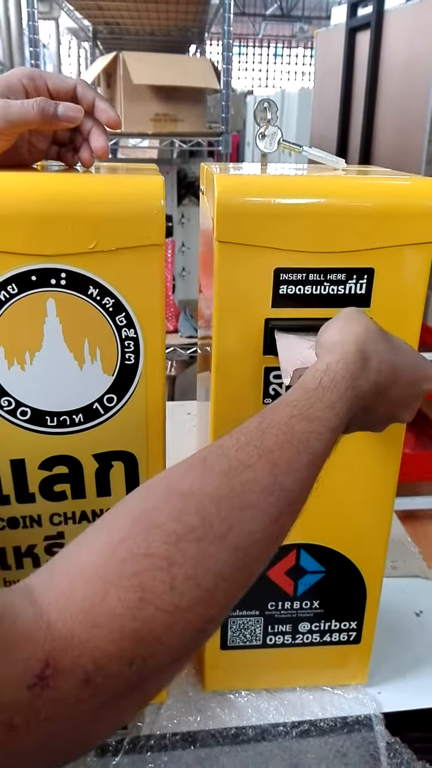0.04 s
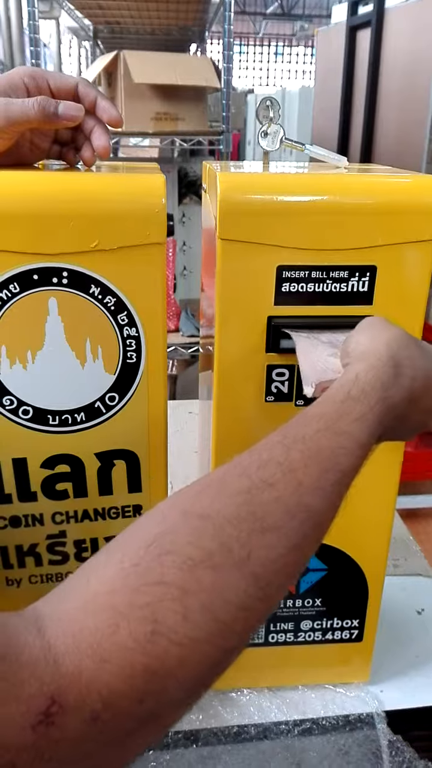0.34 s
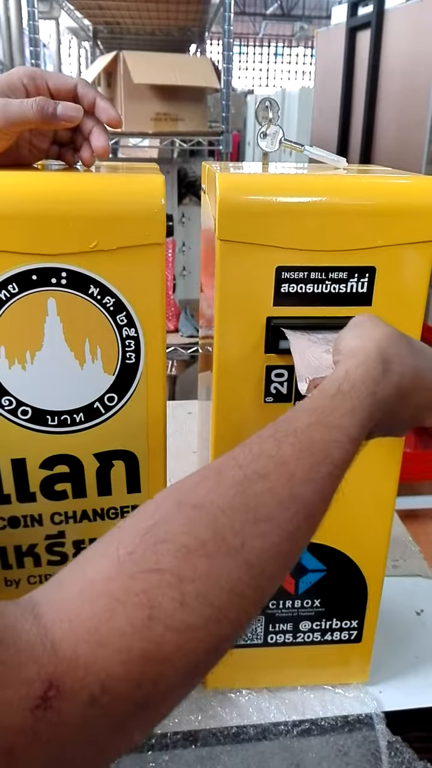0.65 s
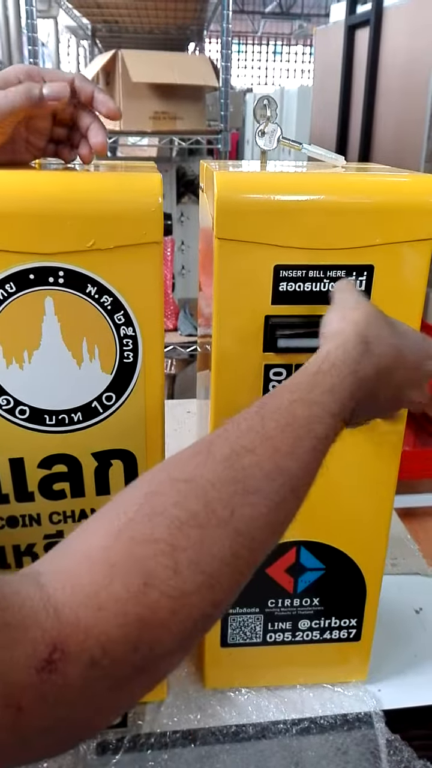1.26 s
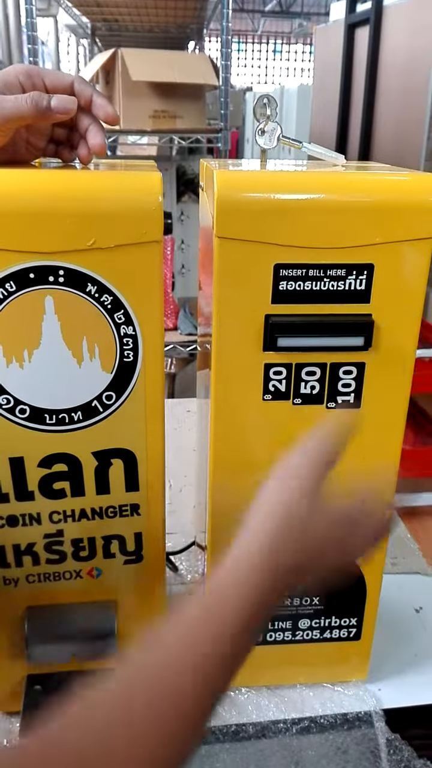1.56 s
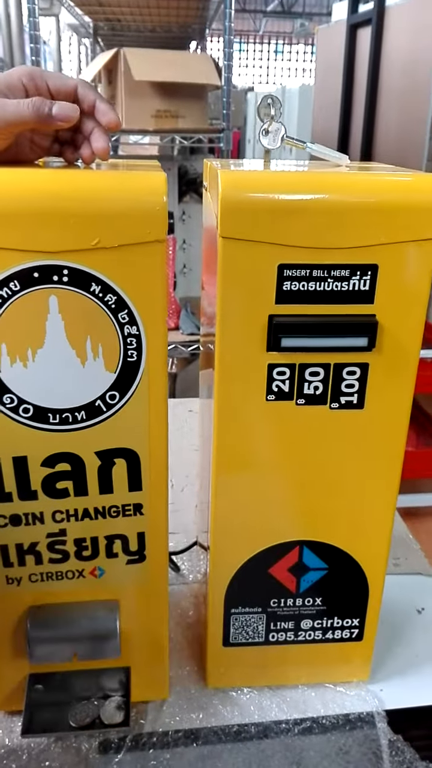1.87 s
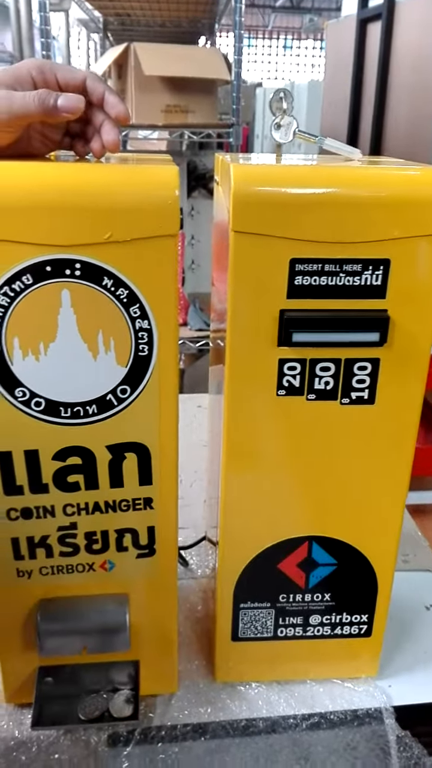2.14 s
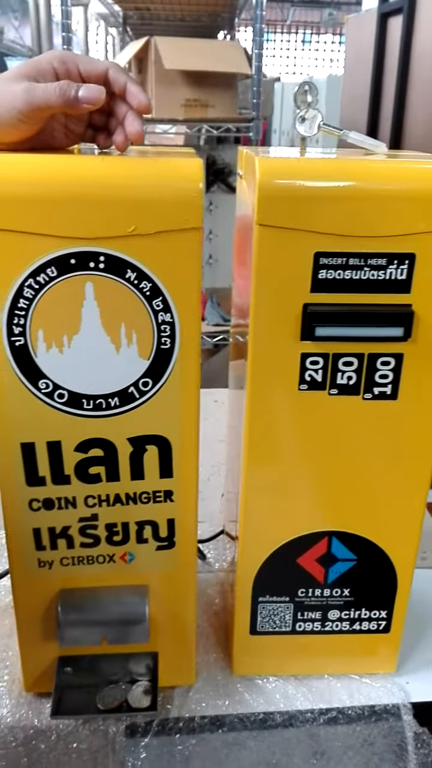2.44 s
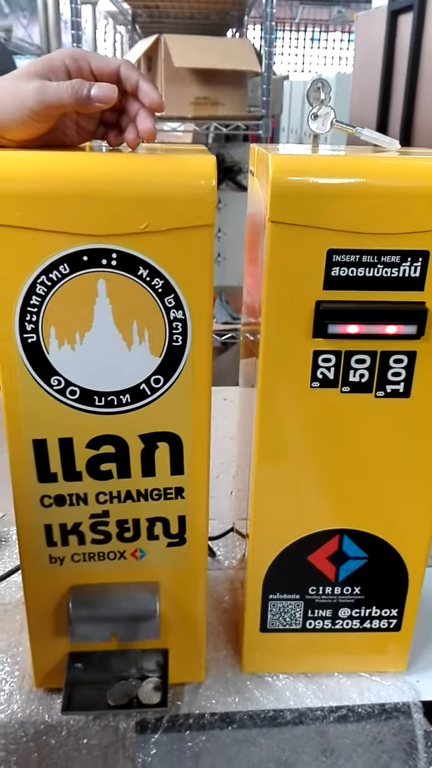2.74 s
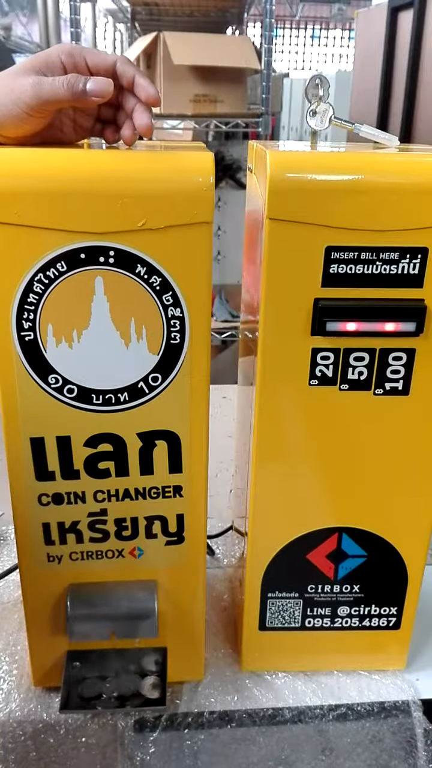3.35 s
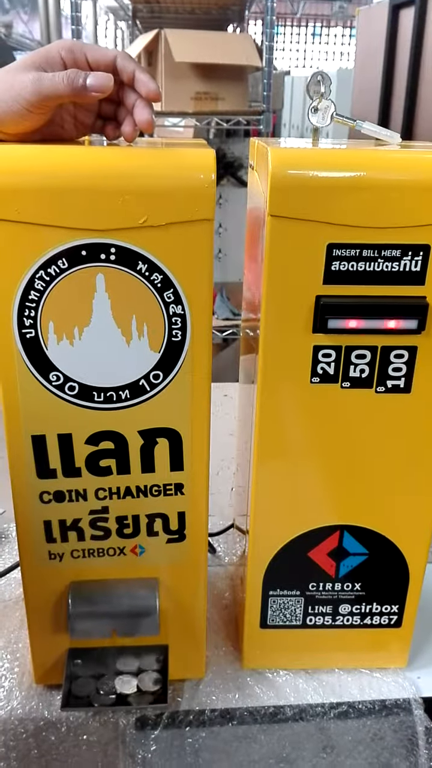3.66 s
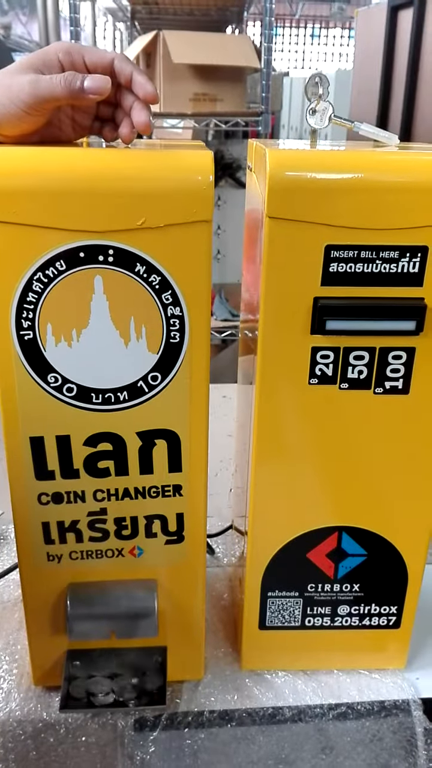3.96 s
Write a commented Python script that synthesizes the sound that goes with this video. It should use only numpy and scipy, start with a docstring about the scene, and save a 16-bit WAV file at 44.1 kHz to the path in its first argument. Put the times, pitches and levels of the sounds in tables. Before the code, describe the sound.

A coin changer whirs twice, then pays out coins in quick, ringing metallic clinks.

```python
"""A small geared motor whines twice over the low rumble of a room: a coin changer, close by, draws in a note.
Then its hopper pays out about five coins a second. The disc thuds against each coin, the ejector clacks,
and the coin strikes the steel chute, slides down it ringing, and lands on the other coins in the tray.
Each impact excites damped modes; friction is a dense train of tiny impacts shaped by resonance."""
import sys
import numpy as np
from scipy import signal
from scipy.fft import rfft, irfft
from scipy.io import wavfile
from scipy.ndimage import uniform_filter1d

SR = 44100
rng = np.random.default_rng(int(sys.argv[2]) if len(sys.argv) > 2 else 0)


def master_out(mix):
    """Clip the mix to full scale and print it as 16-bit PCM to the path in sys.argv[1]."""
    frames = np.transpose(np.atleast_2d(mix))
    ceiling = np.clip(frames, -1, 1)
    pcm = np.round(ceiling * 32767).astype(np.int16)
    wavfile.write(sys.argv[1], SR, pcm)


N = 176400
T = np.arange(N) / SR

# a coin strikes the chute: start_s, level_db, rise_s, slide_s, sliding_ring_db
CHUTE_HITS = [(2.7917, -7.5, 0.00017, 0.097, -18.5), (2.983, -5, 0.0033, 0.098, -18),
              (3.171, -0.5, 0.0092, 0.15, -20.5), (3.372, -8, 0.0011, 0.11, -14.5),
              (3.558, 0.5, 0.011, 0.081, -11.5), (3.7536, -5.5, 0.00057, 0.13, -18),
              (3.9458, -6, 0.00061, .1, -26)]
# a sliding coin knocks against the chute wall: start_s, level_db
WALL_KNOCKS = [(2.864, -17.5), (3.0876, -7.5), (3.224, -18), (3.236, -14.5), (3.249, -23), (3.492, -21),
               (3.604, -21), (3.619, -16), (3.957, -12.5)]
# the ejector snaps and rebounds: start_s, level_db
EJECTOR_CLACKS = [(2.757, -15.5), (2.7601, -11.5), (2.7689, -18.5), (2.955, -11.5), (2.964, -20),
                  (3.149, -11.5), (3.157, -12), (3.334, -14.5), (3.34, -11), (3.352, -14), (3.526, -10),
                  (3.715, -12), (3.721, -11.5), (3.915, -11)]
# a coin lands or bounces in the tray: start_s, level_db
LANDINGS = [(2.683, -14.5), (2.6959, -15.5), (2.874, -16), (2.882, -17.5), (2.897, -18), (3.066, -17.5),
            (3.074, -20), (3.093, -23.5), (3.261, -15.5), (3.273, -17.5), (3.283, -17), (3.298, -28.5),
            (3.449, -17), (3.46, -18), (3.642, -20), (3.65, -14.5), (3.837, -17), (3.845, -19.5),
            (3.86, -22)]
# coins slide over each other: start_s, stop_s, level_db
SHUFFLES = [(2.57, 2.623, -39), (2.916, 2.983, -21), (3.119, 3.18, -15), (3.295, 3.42, -23.5),
            (3.46, 3.566, -22), (3.864, 3.903, -20.5)]
# the disc pushes a coin to the exit: start_s
DISC_THUDS = [2.642, 2.838, 3.027, 3.22, 3.413, 3.605, 3.797]
# runs of the bill motor:
# start_s, stop_s, mesh_hz, spin_up_s, sag_share, gear_db, hiss_db, wobble_share, hiss_top_hz
MOTOR_RUNS = [(1.095, 1.437, 1279, .055, .01, -44, -51, 0.0061, 13800),
              (1.762, 2.407, 1311, .034, .11, -44, -48, 0.023, 10000)]
# airy whistles in the room hiss, thin squeals while the motor runs: start_s, stop_s, pitch_hz, level_db
WHISTLES = [(.06, .19, 7360, -67), (1.43, 1.72, 5430, -68), (1.3, 1.43, 4950, -60), (1.95, 2.38, 8050, -60),
            (1.87, 2.4, 9450, -59)]
# partials of the gear whine: mesh_multiple, level_db
WHINE_PARTIALS = [(.5, -20.5), (1, -5.5), (2, -7.5), (4, -20.5)]
# hum under load as the note is stacked: pitch_hz, level_db
STACK_HUM = [(151, -50.5), (304, -52.5)]
# resonances of the cabinet and hopper: pitch_hz, bandwidth_hz, level_db
CABINET_MODES = [(659, 10.2, 1), (808, 19.4, -3), (929, 5.9, 7), (1097, 12, 4), (1164, 140, -3),
                 (1470, 97, 0.5), (1683, 65, -3), (1880, 7.7, -7), (2510, 420, -10)]
# modes of a free coin, the ejector and chute, the filled tray and the panels: pitch_hz, level_db
COIN_MODES = [(7600, -9), (7720, -11), (8290, -6.5), (8410, -13.5), (13820, -3), (13960, 0)]
STEEL_MODES = [(1465, -8.5), (4328, -6), (5060, -5)]
TRAY_MODES = [(1940, -2.5), (3960, 2), (4080, 0), (4330, -6.5), (4748, -5.5), (5750, -5), (6975, -1),
              (8025, 1.5), (10565, -3), (11650, -5), (12780, 3)]
PANEL_MODES = [(215, -1.5), (251, -1), (339, -9)]
# relative spectral density of each source's noise: frequency_hz, level_db
CHUTE_SPECTRUM = [(200, -11), (700, -12), (1400, 3.5), (3000, -5.5), (5000, 4.5), (6500, -4), (11000, 6),
                  (14300, -2)]
SLIDE_SPECTRUM = [(1200, -1.5), (3200, 4), (4300, 4.5), (5100, 11), (6300, 1.5), (10000, 8), (14300, 5.5)]
EJECTOR_SPECTRUM = [(500, -22), (1400, 3.5), (3200, 1.5), (4300, 3), (6000, -2), (9000, -6.5), (14300, 2.5)]
TRAY_SPECTRUM = [(200, -24), (800, -14), (1800, -3), (3000, -6.5), (4200, -3.5), (9500, -6.5), (14300, -6)]
HOPPER_SPECTRUM = [(100, -6), (250, 1), (540, -18), (950, -8.5), (2000, -8), (4200, -19.5), (14300, -35.5)]
GEAR_SPECTRUM = [(310, -6), (480, -26), (700, -5), (790, -15.5), (950, -1), (1250, -2), (1600, 0),
                 (2050, -11), (2290, -2), (2450, -21.5), (6500, -21), (14000, -61)]
ROLLER_SPECTRUM = [(2700, 3), (3400, 1), (4800, 0), (6000, -6), (8200, -3), (14000, -12)]
ROOM_SPECTRUM = [(22, -5), (67, -7), (135, -11.5), (220, -21), (420, -32), (1100, -33), (2500, -40.5),
                 (7500, -44.5), (14300, -47.5)]
# filter of the stereo side signal: frequency_hz, gain_db
SIDE_SPECTRUM = [(2800, -52), (4500, -22), (6500, -16), (8200, -6), (10000, -14), (13500, -19)]

COIN_T60_S, STEEL_T60_S = 0.08, 0.044
FEED_RISE_S, FEED_COAST_S = 0.062, 0.041
GRIP_DELAY_S, GRIP_WIDTH_S = 0.14, 0.11
THUD_DB, THUD_RISE_S, GRIND_DB, BOOM_DB = -25.5, 0.0046, -35, -20


def chute():
    """Impact excites the modes of coin and chute; sliding friction then keeps driving both."""
    out, t = np.zeros(N), np.arange(SR // 3) / SR
    for start, db, rise, slide_s, ring_db in CHUTE_HITS:
        size = 1 + 0.0017 * rng.standard_normal()  # coins differ slightly in pitch
        coin = ring([(hz / size, level) for hz, level in COIN_MODES], COIN_T60_S)
        strike = crash(CHUTE_SPECTRUM, t60=0.063) + amp(-5) * coin
        add(out, start, amp(db) * strike * np.minimum(t[:len(coin)] / rise, 1))
        scrapes = grit(len(t), per_s=1600, spread_db=1)
        bodies = crash(SLIDE_SPECTRUM, t60=0.011), ring(STEEL_MODES, STEEL_T60_S), coin
        rattle, steel, singing = (unit(signal.fftconvolve(scrapes, body)[:len(t)]) for body in bodies)
        add(out, start, (amp(-19.5) * rattle + amp(-29) * steel) * gate(t, 0, slide_s, 0.0026, 0.036))
        add(out, start, amp(ring_db) * singing * gate(t, 0, 0.71 * slide_s, 0.0059, 0.025))
    return out


def wall_knocks():
    """A coin's collision with the chute wall sets the steel in free vibration."""
    out = np.zeros(N)
    for start, db in WALL_KNOCKS:
        knock = crash(SLIDE_SPECTRUM, STEEL_T60_S) + amp(3.5) * ring(STEEL_MODES, STEEL_T60_S)
        add(out, start, amp(db) * knock)
    return out


def ejector():
    """A sprung lever flicks each coin out; snap and rebound excite the steel impulsively."""
    out = np.zeros(N)
    for start, db in EJECTOR_CLACKS:
        clack = crash(EJECTOR_SPECTRUM, t60=0.083) + amp(3) * ring(STEEL_MODES, STEEL_T60_S)
        add(out, start, amp(db) * clack)
    return out


def tray():
    """Contact damping by the heap in the tray cuts short the ring of each landing."""
    out = np.zeros(N)
    for start, db in LANDINGS:
        clink = crash(TRAY_SPECTRUM, t60=0.047) + amp(-1) * ring(TRAY_MODES, t60=0.075, detune=0.0041)
        add(out, start, amp(db) * clink)
    return out


def loose_coins():
    """Friction between settling coins drives their modes in a thin, ringing hiss."""
    rubs = grit(N, per_s=3000, spread_db=1.8)
    hiss = unit(colour(rubs, SLIDE_SPECTRUM))
    ringing = unit(signal.fftconvolve(rubs, ring(COIN_MODES, COIN_T60_S))[:N])
    envelope = sum(amp(db) * gate(T, start, stop, 0.033, 0.043) for start, stop, db in SHUFFLES)
    return (hiss + amp(-5) * ringing) * envelope


def hopper(on_s=2.49):
    """Forced vibration: a motor stirs the coins, and its disc grinds on each and sets panels booming."""
    stirring = amp(-37) * unit(colour(grit(N, per_s=6000, spread_db=0.53), HOPPER_SPECTRUM))
    motor = hum(hz=140, db=-48) * gate(T, on_s, T[-1], 0.6, 1)
    out = (stirring + motor) * gate(T, on_s, T[-1], 0.0073, 1)
    load = amp(GRIND_DB) * gate(T, DISC_THUDS[0], T[-1], THUD_RISE_S, 1)
    for start in DISC_THUDS:
        load += amp(THUD_DB) * gate(T, start, start + 0.01, THUD_RISE_S, 0.014)
        boom = ring(PANEL_MODES, t60=0.16, detune=0.016)
        add(out, start, amp(BOOM_DB) * boom * np.minimum(T[:len(boom)] / 0.028, 1))
    return out + load * unit(cabinet(grit(N, per_s=2500, spread_db=4.2)))


def cabinet(force):
    """Modal superposition: the cabinet responds as parallel resonators of alternating sign."""
    return sum((-1) ** k * amp(db) * signal.lfilter(*signal.iirpeak(hz, hz / width, SR), force)
               for k, (hz, width, db) in enumerate(CABINET_MODES))


def bill_motor():
    """Gears whine at multiples of their mesh rate, which also modulates the rollers' hiss on the note."""
    out = np.zeros(N)
    for start, stop, mesh_hz, spin_up, sag, gear_db, hiss_db, wobble, top_hz in MOTOR_RUNS:
        age = np.maximum(T - start, 0)
        strain = np.exp(-(age / 0.081) ** 2)  # starting strain lifts the second multiple
        grip = np.exp(-((age - GRIP_DELAY_S) / GRIP_WIDTH_S) ** 2)  # gripping the note slows the motor
        hz = mesh_hz * (1 - 0.51 * np.exp(-age / spin_up)) * (1 - sag * grip)
        hz *= 1 + wobble * (0.5 + 3 * strain) * waver(200)
        phase = 2 * np.pi * np.cumsum(hz) / SR
        teeth = 1 + 0.5 * np.cos(phase)
        whine = np.zeros(N)
        for multiple, db in WHINE_PARTIALS:
            gain = amp(db + (multiple == 2) * 17 * strain) * (1 + 0.5 * waver(300))
            whine += gain * np.sqrt(2) * np.sin(multiple * phase)
        lurch = amp(28 * np.exp(-age / 0.0083))
        chatter = lurch * unit(colour(grit(N, per_s=4000, spread_db=0.72) * teeth, GEAR_SPECTRUM))
        rubbing = colour(grit(N, per_s=7000, spread_db=0.87) * teeth, ROLLER_SPECTRUM)
        hiss = unit(signal.sosfilt(signal.butter(8, top_hz, fs=SR, output="sos"), rubbing))
        out += amp(gear_db) * whine * gate(T, start, stop - 0.03, FEED_RISE_S, 0.016)
        out += amp(gear_db) * chatter * gate(T, start, stop, FEED_RISE_S, FEED_COAST_S)
        out += amp(hiss_db) * hiss * gate(T, start, stop, FEED_RISE_S, 0.0073)
    return out


def stacker(start_s=2.063):
    """The load of stacking the note makes the motor hum until its second run ends."""
    stop_s = MOTOR_RUNS[1][1]
    return sum(hum(hz, db) for hz, db in STACK_HUM) * gate(T, start_s, stop_s, 0.14, FEED_COAST_S)


def hum(hz, db):
    """Slight frequency modulation gives the unsteady tone of a loaded motor."""
    phase = 2 * np.pi * np.cumsum(hz * (1 + 0.032 * waver(600))) / SR
    return amp(db) * np.sqrt(2) * np.sin(phase)


def whistles():
    """Narrow-band noise has pitch: faint whistles in the room hiss, thin squeals while the motor runs."""
    out = np.zeros(N)
    for start, stop, hz, db in WHISTLES:
        peak = signal.iirpeak(hz, Q=16, fs=SR)
        band = unit(signal.lfilter(*peak, signal.lfilter(*peak, rng.standard_normal(N))))
        out += amp(db) * band * gate(T, start, stop, 0.049, 0.0081)
    return out


def reverberation(x, t60=0.1):
    """Sparse reflections in a small room decay exponentially."""
    t = np.arange(SR // 2) / SR
    tail = grit(len(t), per_s=3000, spread_db=0.44) * amp(-60 * t / t60) * (t > 0.003)
    return signal.fftconvolve(x, tail / np.linalg.norm(tail))[:N]


def background():
    """Comb filtering: room noise interferes with its reflection off a near surface by a drifting path."""
    noise = colour(rng.standard_normal(N), ROOM_SPECTRUM)
    delay_s = 0.00072 * (1 + 0.067 * waver(SR // 2))
    return amp(-46.5) * unit(noise + 0.33 * np.interp(T - delay_s, T, noise))


def ring(modes, t60, detune=0.0021):
    """Damped free vibration; the modes scatter in level, pitch and phase from blow to blow."""
    t = np.arange(SR // 4) / SR
    tones = np.zeros(len(t))
    for hz, db in modes:
        gain = amp(db + 5 * rng.uniform(-1.22, 1))
        pitch_hz = hz * (1 + detune * rng.standard_normal())
        tones += gain * np.sin(2 * np.pi * (pitch_hz * t + rng.random()))
    return tones * amp(-60 * t / t60)


def crash(spectrum, t60):
    """Modal overlap: after the crack of contact, the crowded modes of struck steel decay as noise."""
    t = np.arange(SR // 4) / SR
    envelope = amp(-5.5) * np.exp(-t / 0.0037) + 0.93 * amp(-60 * t / t60)
    return unit(colour(rng.standard_normal(len(t)), spectrum)) * envelope


def grit(size, per_s, spread_db):
    """Shot noise: random tiny impacts of uneven strength."""
    strengths = rng.standard_normal(size) * amp(spread_db * np.minimum(rng.exponential(1, size), 3))
    return unit(strengths * (rng.random(size) < per_s / SR))


def colour(x, spectrum):
    """Spectral shaping, with a 12 dB per octave roll-off below the first point."""
    hz, db = np.transpose(spectrum)
    f = np.fft.rfftfreq(len(x), 1 / SR) + 1
    gain = amp(np.interp(np.log(f), np.log(hz), db)) * np.minimum(f / hz[0], 1) ** 2
    return irfft(rfft(x) * gain, len(x))


def gate(t, start, stop, rise, fall):
    """Linear attack, hold, exponential release."""
    return np.clip((t - start) / rise, 0, 1) * np.exp(-np.maximum(t - stop, 0) / fall)


def waver(samples):
    """Smoothed noise: a slow fluctuation of rms 1."""
    return unit(uniform_filter1d(uniform_filter1d(rng.standard_normal(N), samples), samples))


def amp(db):
    """Decibels to amplitude ratio."""
    return 10 ** (np.asarray(db) / 20)


def unit(x):
    """Normalisation to rms 1."""
    return x / np.sqrt(np.mean(x ** 2) + 1e-20)


def add(mix, start_s, sound):
    """Superposition of a sound on the mix."""
    part = mix[round(start_s * SR):][:len(sound)]
    part += sound[:len(part)]


def scene():
    """Direct and reflected sound add to the room noise; decorrelation widens only the coins' treble."""
    coins = chute() + wall_knocks() + ejector() + tray() + loose_coins()
    direct = coins + hopper() + bill_motor() + stacker() + whistles()
    mid = direct + amp(-8.5) * reverberation(direct) + background()
    quadrature = signal.hilbert(coins).imag
    side = colour(0.35 * quadrature + 0.7 * reverberation(coins), SIDE_SPECTRUM)
    return np.array([mid + side, mid - side])


def record(dry):
    """Soft saturation rounds the loudest blows, both channels alike; a low-pass limits the band."""
    limited = dry / (1 + dry.mean(0) ** 8) ** (1 / 8)
    low_pass = signal.firwin(601, cutoff=14300, window=("kaiser", 7), fs=SR)
    return signal.oaconvolve(limited, low_pass[None], "same")


dry = scene()
out = record(dry)
master_out(out)
```